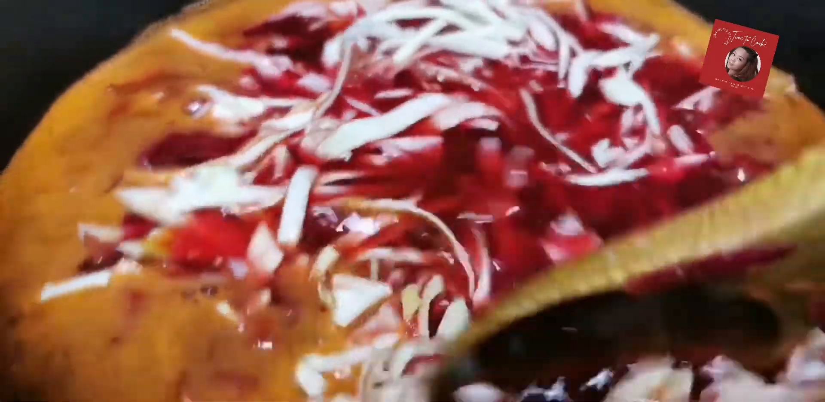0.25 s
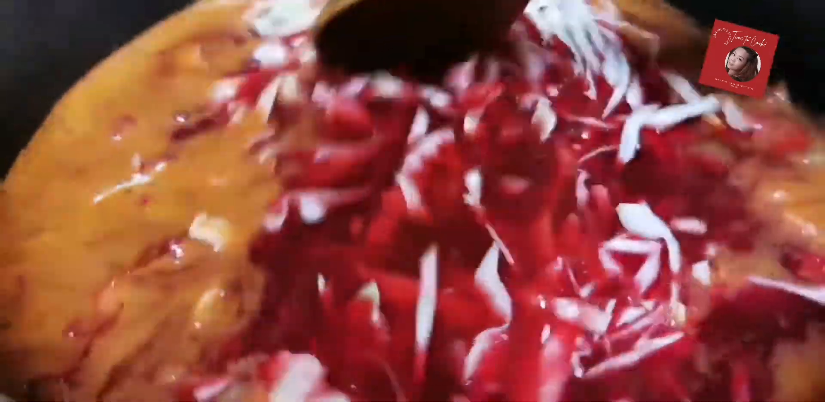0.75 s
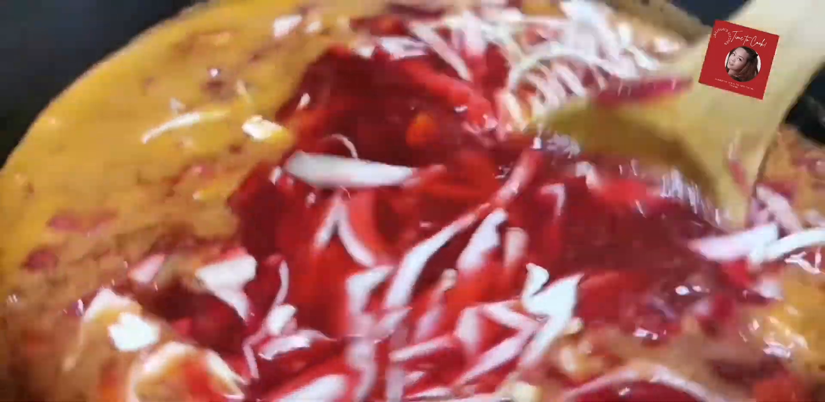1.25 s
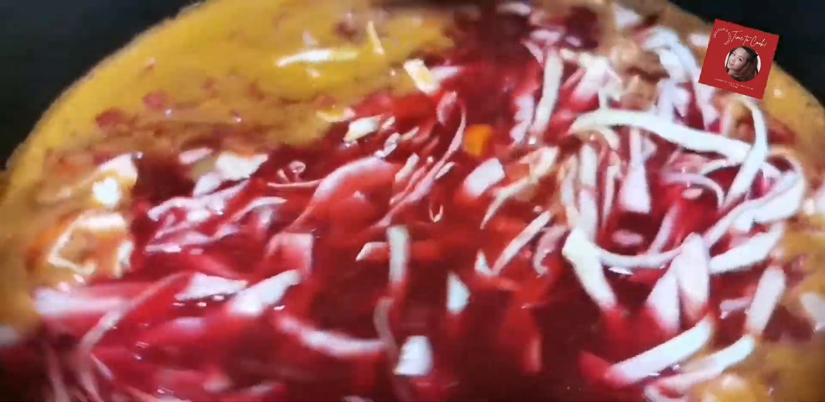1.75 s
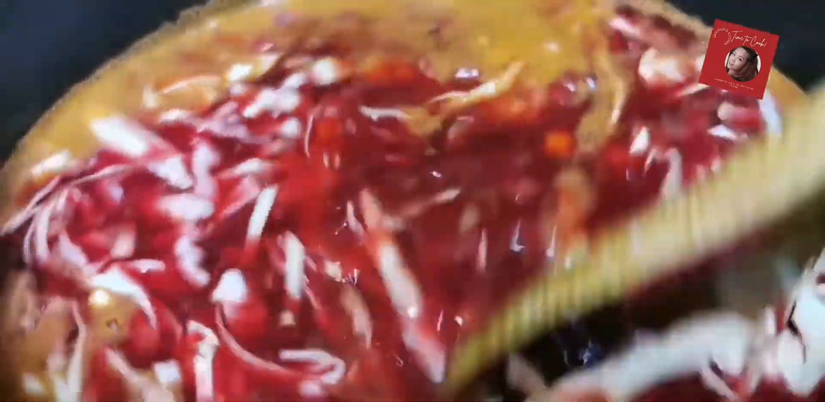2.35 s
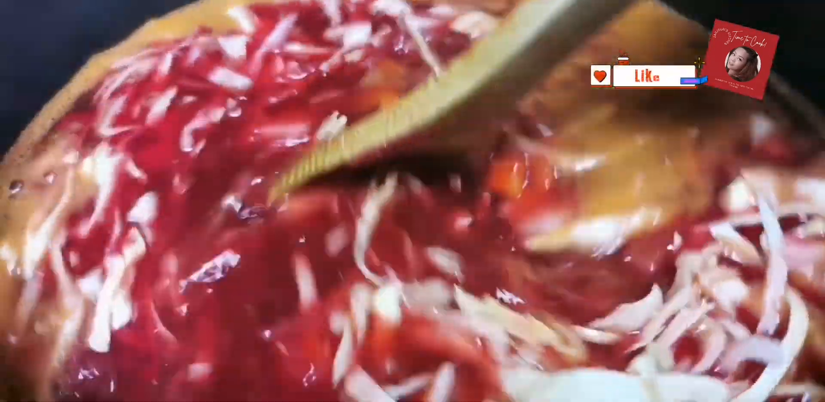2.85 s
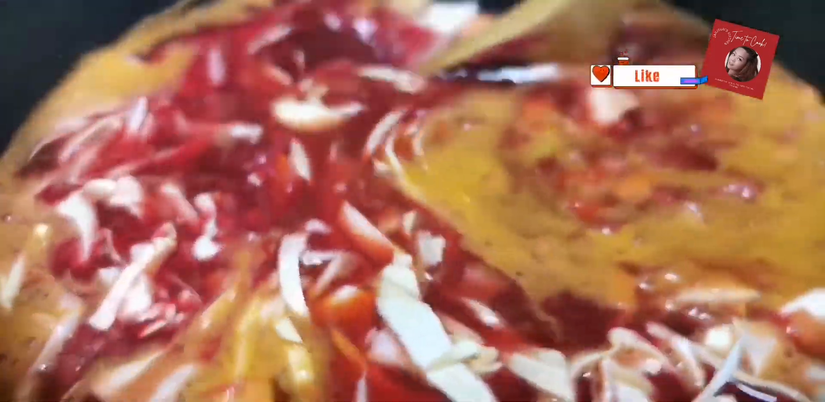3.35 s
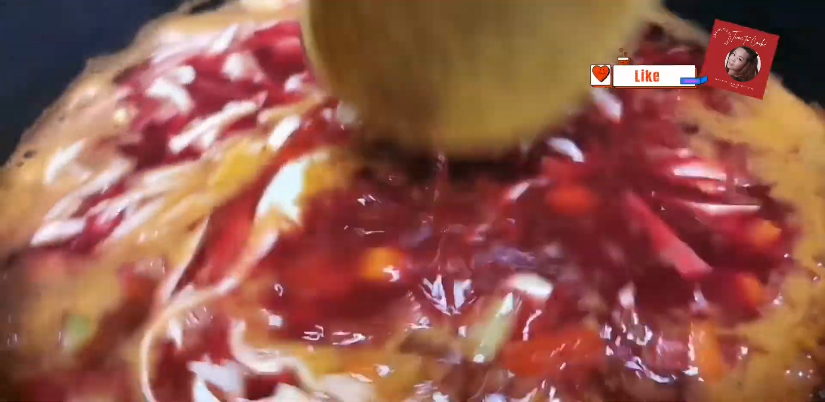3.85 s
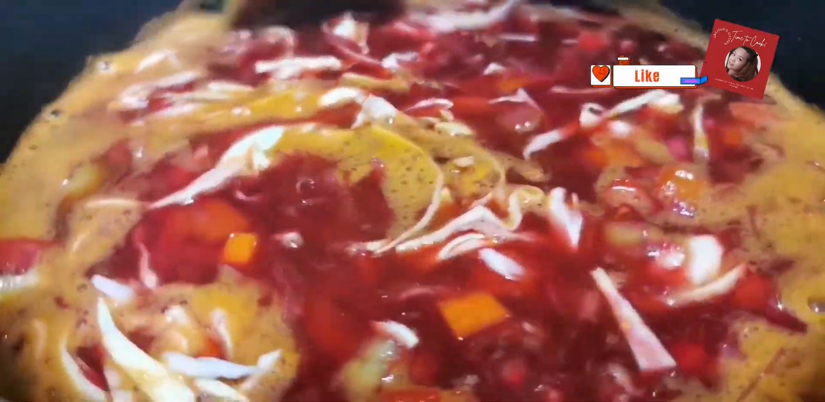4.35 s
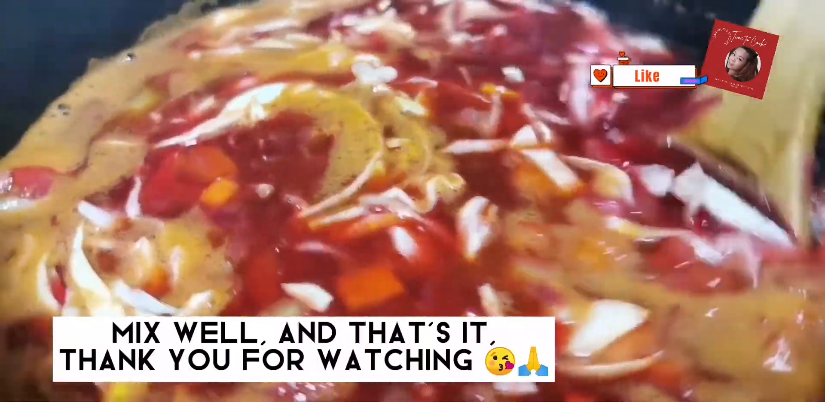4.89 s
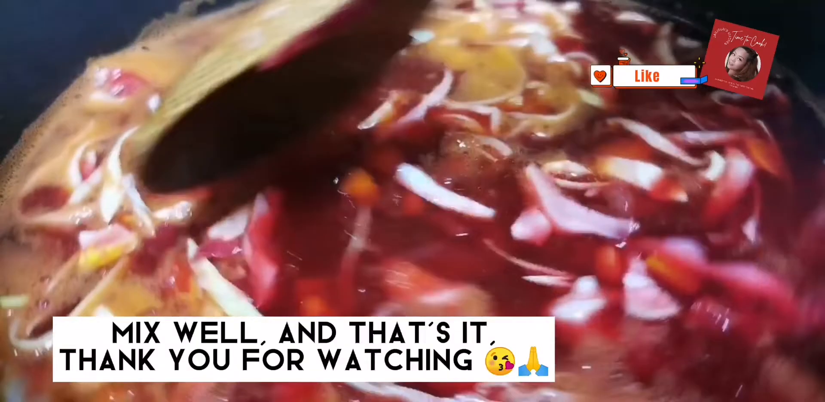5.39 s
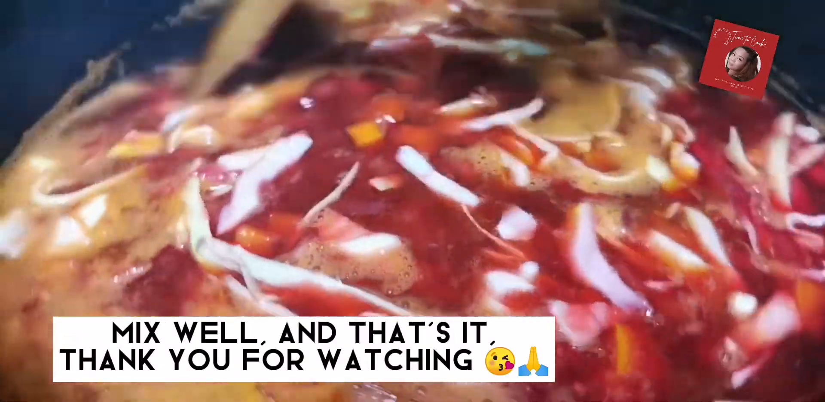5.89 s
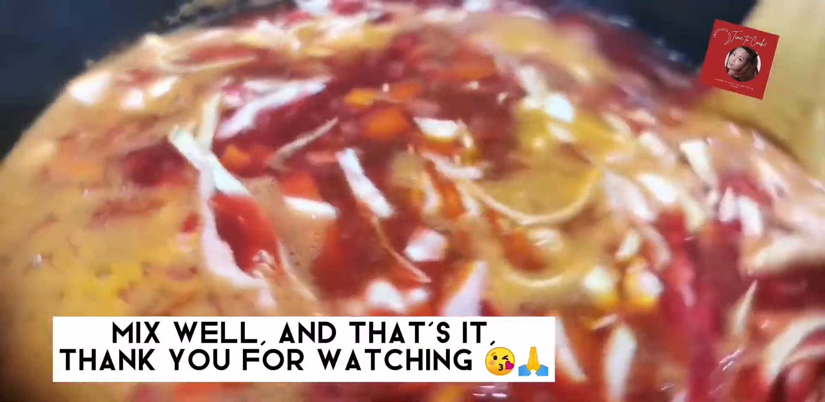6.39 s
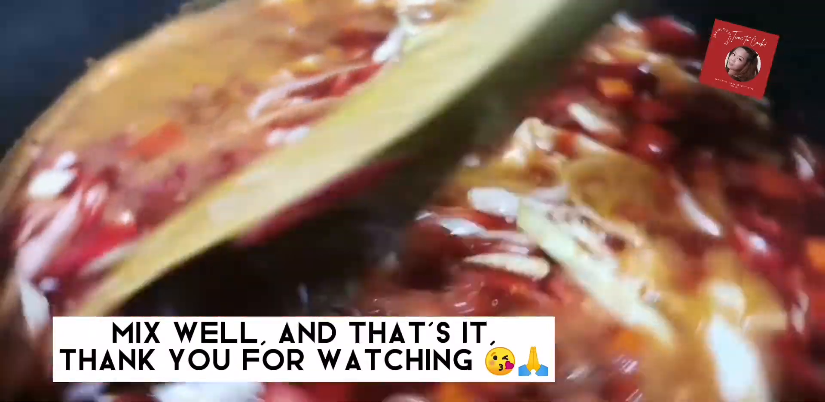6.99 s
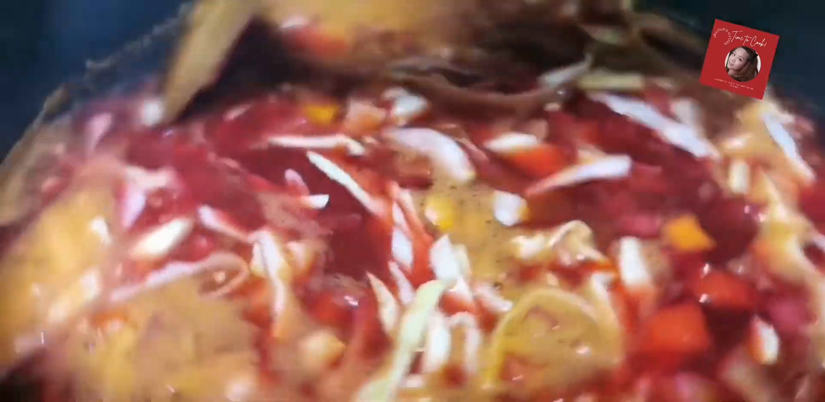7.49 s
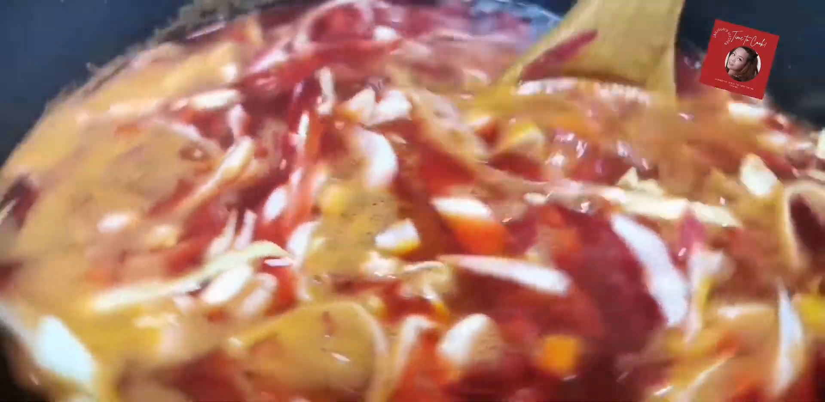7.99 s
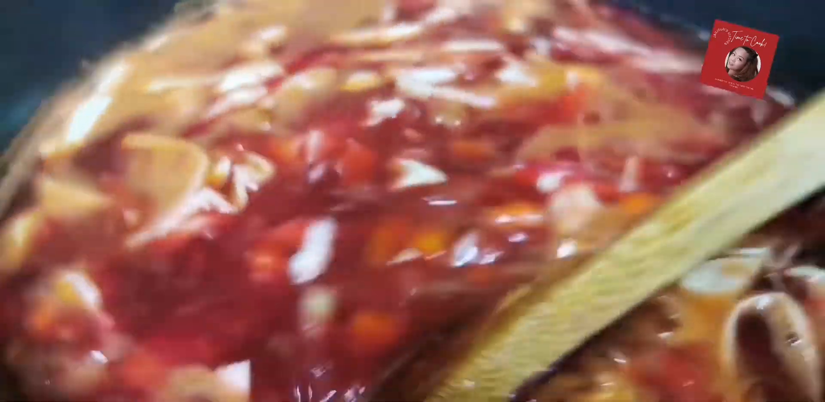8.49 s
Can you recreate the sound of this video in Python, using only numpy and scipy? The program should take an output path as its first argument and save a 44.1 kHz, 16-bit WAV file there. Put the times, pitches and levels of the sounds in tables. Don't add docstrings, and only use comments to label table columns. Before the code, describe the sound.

Close by a pot, low rumbling simmer, steady gas hiss and fizzing foam, then wooden knocks, rising scrapes and dull thuds from a stirring ladle.

```python
import sys
import numpy as np
from scipy import signal
from scipy.fft import rfft, irfft
from scipy.io import wavfile
from scipy.ndimage import uniform_filter1d, map_coordinates

SR = 44100
rng = np.random.default_rng(int(sys.argv[2]) if len(sys.argv) > 2 else 0)


def invert_db(level):
    return 10 ** (np.asarray(level, dtype=float) / 20)


def waveform_to_disk(signal):
    frames = np.transpose(np.atleast_2d(signal))
    scaled = np.clip(frames, -1, 1) * 32767
    samples = np.round(scaled).astype(np.int16)
    wavfile.write(sys.argv[1], SR, samples)


N = 385424
TOP_HZ = 15510


def unit(x):
    return x / np.sqrt(np.mean(x ** 2) + 1e-20)


def along(points, hz):
    f, v = np.transpose(points)
    return np.interp(np.log(hz + 1), np.log(f + 1), v)


def wobble(rate):
    return map_coordinates(rng.standard_normal(int(N * rate / SR) + 4), [np.arange(N) * rate / SR])


def rush(gain_db, patchy_db):
    hz, _, z = signal.stft(rng.standard_normal(N + 4096), SR, nperseg=1024)
    patches = uniform_filter1d(rng.standard_normal(z.shape), 8, 0)
    patches = uniform_filter1d(patches, 6, 1)
    x = signal.istft(z * invert_db(patchy_db * unit(patches)), SR, nperseg=1024)[1]
    colour = invert_db(gain_db(np.fft.rfftfreq(len(x), 1 / SR)))
    return unit(irfft(rfft(x) * colour, len(x))[:N])


def rings(s, db, hz, t60, rise, length):
    t = np.arange(int(length * SR)) / SR
    decay = invert_db(db[:, None] - 60 * t / np.abs(t60)[:, None])
    wave = decay * np.sin(2 * np.pi * hz[:, None] * t) * (1 - np.exp(-t / rise))
    at = np.round(s * SR).astype(int)[:, None] + np.arange(len(t))
    return np.bincount(at.ravel(), wave.ravel(), N + SR)[:N]


def struck(s, db, modes, rise, scatter_db=1):
    hz, level, t60 = np.transpose(modes)
    level = db + level + scatter_db * rng.standard_normal(len(hz))
    return rings(np.full(len(hz), s), level, hz, t60, rise, .5)


# frequency in Hz, level in dB per Hz.
RUMBLE_COLOUR = [(8.8, -1), (15, -2.5), (32, -0.5), (58, -8), (86, -6.5), (135, -5), (172, -17.5),
                 (262, -9.5), (371, -20), (392, -20), (489, -18), (516, -20.5), (598, -23), (1040, -35),
                 (1200, -33.5), (1560, -56), (2640, -120)]
# time in seconds, level in dB.
HEAVE = [(0, -58), (1.0, -61.5), (2.2, -56.5), (3.4, -56.5), (4.7, -57), (7.2, -58), (7.5, -52),
         (7.9, -54.5), (8.74, -56)]


def rumble():
    split_hz = 140
    s, heave_db = np.transpose(HEAVE)
    swell_db = .6 * wobble(8) + .8 * wobble(2)

    def loss_db(ratio):
        return 10 * np.log10(1 + ratio ** 4)

    heave = rush(lambda f: along(RUMBLE_COLOUR, f) - loss_db(f / split_hz), patchy_db=1.3)
    heave *= invert_db(np.interp(np.arange(N) / SR, s, heave_db) + 4.0 + swell_db)
    hum = rush(lambda f: along(RUMBLE_COLOUR, f) - loss_db(split_hz / (f + 1)), patchy_db=1.65)
    return heave + invert_db(-57.5 + 0.57 * wobble(1.364)) * hum


# frequency in Hz, level in dB per Hz.
FLAME_COLOUR = [(410, -27), (700, -2.5), (1040, -7), (1550, -5.5), (1630, -7.5), (2480, -4.5), (3440, -12),
                (4890, -8), (8450, -9), (11100, -9.5), (15800, -17)]
# centre in Hz, width in Hz, boost in dB.
PORTS = [(2400, 2160, 3.5), (4990, 940, 2.5), (6810, 520, 5.5), (10600, 1360, 4.5), (15000, 800, 9)]


def flame():
    def colour_db(f):
        ports_db = sum(db / (1 + ((f - c) / w * 2) ** 2) for c, w, db in PORTS)
        return along(FLAME_COLOUR, f) + ports_db

    return invert_db(-61.5) * rush(colour_db, patchy_db=1.53)


# frequency in Hz, level in dB rms.
WHISTLES = [(5351, -87), (5986, -83.5), (6627, -88), (10853, -91), (13819, -95)]


def whistles():
    out = np.zeros(N)
    for hz, db in WHISTLES:
        level = invert_db(db + 5.0 + 2 * wobble(2.53))
        phase = 2 * np.pi * np.cumsum(hz + 3.7 * wobble(4)) / SR
        out += level * np.sin(phase)
    return out


# frequency in Hz, level in dB per Hz.
FOAM_COLOUR = [(5000, -33), (8000, -2), (11000, 6), (14000, 2.5), (16000, -28)]
# time in seconds, peak level in dB, pitch in Hz.
LARGE_POPS = [(0.0618, -47, 11500), (0.2007, -49, 10500), (.2573, -50, 10600), (.3102, -48, 10500),
              (.3855, -49, 14000), (.4334, -52, 14000), (.5053, -49, 12000), (.6135, -47, 13500),
              (.7612, -53, 14000), (.826, -49, 12000), (.8325, -47, 14000), (.9872, -51, 12500),
              (1.6107, -52, 14000), (1.679, -49, 10500), (1.773, -49, 10500), (1.8078, -50, 14000),
              (1.8736, -47, 14000), (1.9929, -49, 13500), (2.09, -50, 13000), (2.368, -48, 9500),
              (2.6808, -55, 13000), (2.9643, -51, 7500), (4.7379, -50, 14000), (6.6598, -50, 12000),
              (7.047, -46, 11900)]


def foam():
    t = np.arange(N) / SR
    settle_s, small_count = 1.6, 36
    clumps = invert_db(3.2 * wobble(400) + wobble(30))
    fizz_db = -71 + 5 * np.exp(-t / settle_s) + 2.4 * wobble(5)
    fizz = invert_db(fizz_db) * unit(clumps * rush(lambda f: along(FOAM_COLOUR, f), patchy_db=2.5))

    small_s = settle_s * rng.exponential(size=small_count) % t[-1]
    small_db = -54.5 + 2.5 * rng.standard_normal(small_count)
    octaves = .2 * np.clip(rng.standard_normal(small_count), -2, .5)
    s, db, hz = np.transpose(LARGE_POPS)
    s, db, hz = np.r_[s, small_s], np.r_[db, small_db], np.r_[hz, 12550 * 2 ** octaves]

    pops = np.zeros(N)
    for ratio in [.7, .8, .9, 1., 1.12, 1.25]:
        lag_s = .0006 * rng.random(len(s))
        pops += rings(s + lag_s, db - 2, np.minimum(hz * ratio, TOP_HZ), 60 / hz, 1e-4, .01)
    return fizz + pops


# frequency in Hz, time to fall 60 dB in seconds.
KITCHEN_DECAY = [(80, 1), (300, 0.6), (1000, 0.3), (3000, 0.2), (10000, 0.17)]


def kitchen(x):
    bass_hz = 310
    out, hop = np.zeros(N + SR), int(.3 * SR)
    for k in range(0, N, hop):
        hz, t, z = signal.stft(rng.standard_normal(SR // 2), SR, nperseg=512)
        z = z / (1 + (bass_hz / (hz[:, None] + 1)) ** 2)
        decay = invert_db(-60 * t / along(KITCHEN_DECAY, hz)[:, None])
        tail = signal.istft(z * decay, SR, nperseg=512)[1]
        tail = np.pad(tail / np.linalg.norm(tail), (300, 0))
        wet = signal.fftconvolve(x[k:k + hop], tail)
        out[k:][:len(wet)] += wet[:N + SR - k]
    return out[:N]


# frequency in Hz, level in dB, decay (t60) in seconds.
HOB = [(43.3, -12, 0.23), (70, 6, 0.21), (84.3, 9.5, 0.22)]
# time in seconds, level in dB, pitch factor.
THUMPS = [(2.838, -42, 0.79), (4.522, -44, 0.98), (6.549, -38.5, 0.96), (7.361, -34, .99),
          (7.701, -39.5, 0.97), (8.10, -42, 0.88)]


def hob_thumps():
    return sum(struck(s, db, np.array(HOB) * [pitch, 1, 1], rise=0.032) for s, db, pitch in THUMPS)


# frequency in Hz, level in dB, decay (t60) in seconds.
STEEL = [(940, -2, 0.049), (1250, -10, 0.07), (2390, 5.5, 0.025), (2460, -11, 0.04), (4277, -16, 0.17),
         (4730, 3, 0.054), (4780, 1.5, .06), (5626, -3, 0.092), (5750, -7, 0.055), (6460, -5, .05),
         (9400, -7, .05), (10500, -9, 0.054), (12000, -7, 0.054), (14400, -7, .08), (14800, -2, .12),
         (15300, -7, .1)]
# time in seconds, level in dB.
CLINKS = [
    (1.472, -45.5),
    (1.49, -58),
    (1.499, -57),
    (1.519, -64),
]


def steel_clink():
    return sum(struck(s, db, STEEL, rise=0.00076, scatter_db=0.0) for s, db in CLINKS)


# time in seconds, peak level in dB, pitch in Hz, crack in dB.
TICKS = [(.192, -47.5, 2600, 3), (.258, -49, 2300, 18), (.34, -50, 900, -10), (0.61, -43, 2500, 4),
         (1.6362, -55, 747, 21), (2.964, -49, 2240, -5), (4.9667, -44, 2000, 0), (5.034, -36.5, 1930, 2),
         (5.0926, -44, 2056, 0), (5.2694, -45.5, 1310, 9), (5.9205, -46, 1240, 16), (6.1694, -41, 721, 2),
         (6.2926, -47, 767, 0), (6.4008, -37, 1300, 8), (6.473, -39.5, 2030, 15), (7.9728, -31, 1600, -2),
         (8.013, -38, 1310, -5), (8.03, -43, 1250, -2), (8.0737, -34, 2338, 4)]


def ladle_ticks():
    s, db, hz, crack_db = np.transpose(TICKS)
    t60 = np.full(len(s), 0.0089)
    ticks = rings(s, db - 0.5, hz, t60, 0.00013, .05)
    ticks += rings(s, db - 12.0, 1.43 * hz, 0.82 * t60, 0.00025, .05)
    ticks += rings(s, db - 0.5, 0.79 * hz, 0.51 * t60, 0.000089, .05)
    return ticks + rings(s, db - 8.5 + crack_db, 2.664 * hz, 0.3 * t60, 0.0001, .05)


# time in seconds, level in dB, pitch in Hz, decay (t60) in seconds.
LONE_RINGS = [(7.6642, -30, 2015, 0.033), (7.6645, -28, 1330, 0.017), (.609, -52, 1930, 0.022),
              (5.134, -46, 2430, .03)]


def lone_rings():
    return rings(*np.transpose(LONE_RINGS), 0.00023, .08)


# centre in Hz, width in Hz, level in dB.
RUBBED = [
    [(253, 70, -2), (312, 120, 0), (422, 104, 1), (500, 120, -2.5)],
    [(610, 157, -1), (748, 68, 4), (950, 260, -3.5)],
    [(1250, 107, 1), (1546, 230, 2), (1840, 480, -1)],
    [(2450, 380, 10), (3110, 1500, 4.5)],
]
# centre in Hz, level in dB, loss in dB per octave squared.
WAKES = [(400, -1.5, 1), (834, 0, 21.5), (1600, 1.5, 21.5), (2480, -9.5, 2.5)]
# start in seconds, length in seconds, level in dB, first and last contact in Hz.
DRAGS = [
    (4.596, 0.16, -57, 520, 1060),
    (5.093, 0.062, -55, 2950, 3130),
    (6.105, 0.3245, -48, 443, 1670),
    (7.789, 0.23, -47, 363, 1910),
]


def drags():
    lift_s, speed_up = 0.014, 1.08
    out, t, f = np.zeros(N), np.arange(N) / SR, np.fft.rfftfreq(N, 1 / SR)
    catches = invert_db(1.5 * wobble(28))
    for group, (centre_hz, wake_db, loss_db) in zip(RUBBED, WAKES):
        chatter = rng.standard_normal(N) * invert_db(3.3 * wobble(300) + .8 * wobble(70))
        shape = np.zeros(len(f), complex)
        for j, (c, w, db) in enumerate(group):
            shape += (-1) ** j * invert_db(db) * 1j * f * w / (c * c - f * f + 1j * f * w)
        ring = unit(irfft(rfft(chatter) * shape * np.abs(shape), N))
        for s, length, db, first_hz, last_hz in DRAGS:
            climb = np.clip((t - s) / length, 0, 1) ** speed_up
            contact_hz = first_hz * (last_hz / first_hz) ** climb
            away = np.log2(contact_hz / centre_hz)
            stroke = np.clip(np.minimum(t - s, s + length - t) / lift_s + .5, 0, 1)
            out += stroke * catches * invert_db(db + wake_db - loss_db * away ** 2) * ring
    return out


# frequency in Hz, level in dB, decay (t60) in seconds.
BOTTOM = [(179.4, -9.5, 0.46), (262.4, -1.5, 0.16), (308, 2.5, 0.12), (418, 2, 0.13), (483.5, 3.5, 0.053),
          (498, -10.5, 0.072), (583, -1, .06), (606, -7, 0.035), (750, -9, 0.046)]
# time in seconds, level in dB, upper modes in dB, pitch factor.
THUDS = [(4.5077, -33, -8, 0.8), (4.5223, -37, -11, 0.95), (6.5265, -25.5, -5.5, 0.94),
         (6.577, -45, -5, 0.76), (6.64, -46, -19, 0.9), (7.745, -43, -3, 1), (8.0640, -36.5, -19, 0.82)]


def bottom_thuds():
    out = np.zeros(N)
    for s, db, upper_db, pitch in THUDS:
        bottom = np.array(BOTTOM) * [pitch, 1, 1]
        out -= struck(s, db, bottom[:3], rise=0.0024)
        out -= struck(s, db + upper_db, bottom[3:], rise=0.00024)
    return out


# time in seconds, level in dB, sign, pitch in Hz.
PUSHES = [(4.5067, -15, 1, 480), (4.5222, -39, 1, 300), (6.5265, -11.5, -1, 490)]


def pushes():
    out = np.zeros(N)
    for s, db, sign, hz in PUSHES:
        out += np.sign(sign) * struck(s, db, [(hz, 12, 4.35 / hz)], rise=0.0041, scatter_db=4.5)
    return out


def cushioned(x):
    return signal.sosfilt(signal.butter(3, 836, fs=SR, output='sos'), x)


# frequency in Hz, level in dB, decay (t60) in seconds.
BOOM = [(155, -2, .24), (163, -2, .24), (174, -12, .3), (197, -15, .2)]
BODY = [(255, -5, .14), (290, -11, .2), (322, 2, .09), (345, -9, .2), (375, -11, .2), (410, -10, .15)]
UPPER = [(480, -20, 0.19), (519, 6.5, 0.062), (582, 1, 0.098), (626, 4.5, 0.055)]
BOWL = [(702, 1.5, 0.04), (780, 1, 0.056), (900, 1.5, 0.04), (1014, -7, 0.05)]
LADLE = [(1120, 9, 0.013), (1240, 8.5, 0.014), (1340, -22.5, 0.02), (1456, -11.5, 0.052)]
RIM = [(1984, 10, 0.011), (2113, 7, 0.012), (2460, 7.5, 0.02), (2690, 4, 0.019), (3045, 3, 0.0199),
       (3370, 1, 0.015)]
CRACK = [(4380, 12.5, 0.0027), (5700, 14.5, 0.0017), (8500, -7, 0.0074), (12000, -17.5, .004)]
# time in seconds, level in dB, then low body, ladle and rim in dB relative to it.
KNOCKS = [
    (4.5070, -36, 1, -1, 4.5),
    (6.0454, -28, 2.5, -11.5, -10),
    (7.3377, -25, 3.5, -1, -6),
    (7.6645, -35, 7, -14, -9.5),
]


def wall_knocks():
    out, t = np.zeros(N), np.arange(SR // 3) / SR
    wash_band = signal.butter(2, (750, 1600), 'band', fs=SR, output='sos')
    for s, db, body_db, ladle_db, rim_db in KNOCKS:
        out += struck(s + 0.0036, db + body_db + 0.5, BOOM, rise=0.01, scatter_db=5)
        out -= struck(s + 0.0016, db + body_db, BODY, rise=0.0013)
        out -= struck(s + 0.00215, db, UPPER, rise=0.0019)
        out -= struck(s, db + ladle_db, BOWL, rise=0.0016)
        out -= struck(s, db + ladle_db - .6, LADLE, rise=0.00065)
        out -= struck(s + .00005, db + rim_db, RIM, rise=0.00072, scatter_db=2.0)
        out -= struck(s + 0.0003, db + rim_db - 10.0, CRACK, rise=1e-4)
        wash = unit(signal.sosfilt(wash_band, rng.standard_normal(len(t))))
        out[round(s * SR):][:len(t)] += invert_db(db - 22.5 - 60 * t / 0.22) * wash
    return out


def scene():
    pot = rumble() + flame() + whistles() + foam()
    touches = steel_clink() + ladle_ticks() + lone_rings()
    blows = wall_knocks() + cushioned(bottom_thuds() + pushes() + hob_thumps())
    ladle = touches + drags() + blows
    return (ladle + invert_db(-10) * kitchen(ladle) + pot)[None]


def low_pass(x):
    return signal.sosfilt(signal.butter(12, 16300, fs=SR, output="sos"), x)


def record(dry):
    kept = np.where(np.fft.rfftfreq(N, 1 / SR) < TOP_HZ, 1, invert_db(-35))
    mix = irfft(rfft(dry) * kept, N) - .0007
    return low_pass(mix)


dry = scene()
out = record(dry)
waveform_to_disk(out)
```